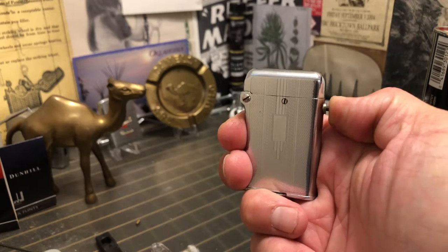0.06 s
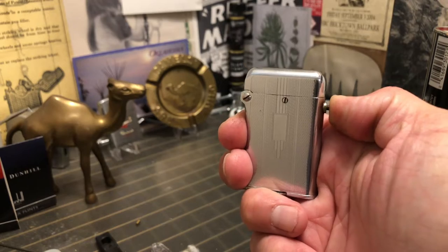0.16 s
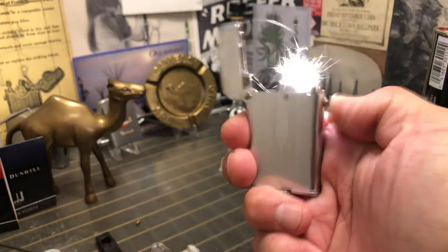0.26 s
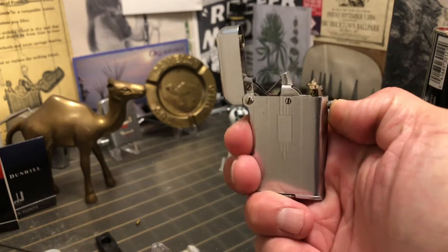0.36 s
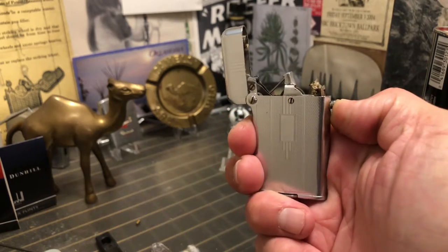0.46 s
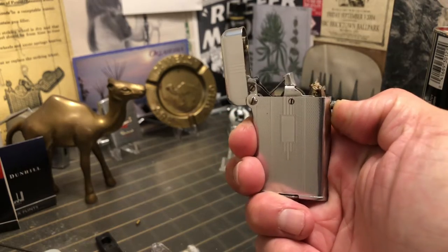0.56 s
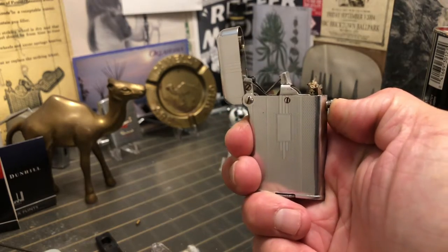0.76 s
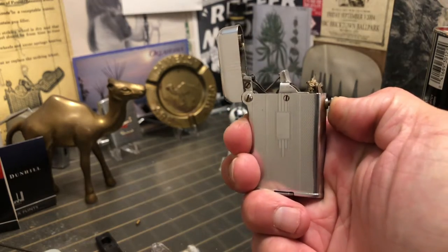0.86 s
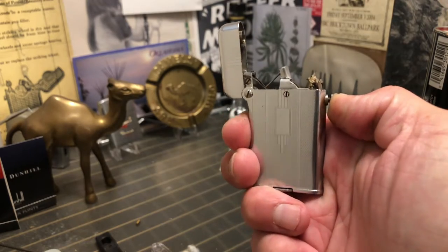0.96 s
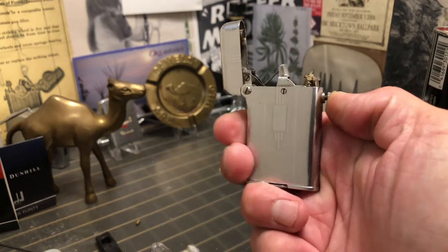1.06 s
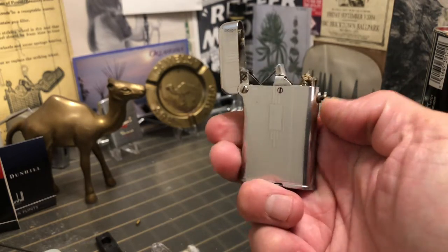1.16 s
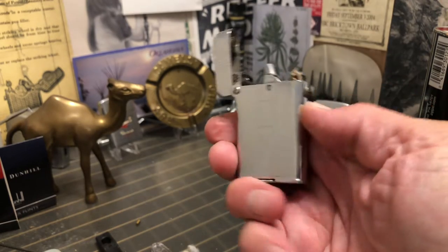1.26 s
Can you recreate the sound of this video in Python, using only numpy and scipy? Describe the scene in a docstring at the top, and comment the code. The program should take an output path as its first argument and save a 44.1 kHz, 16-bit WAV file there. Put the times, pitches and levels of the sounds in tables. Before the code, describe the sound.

One crisp metallic click of a lighter lid springing open in a quiet room.

```python
"""A low appliance hum wavers over rumble, moving air and faint hiss in a small room.
A thumb presses the button of a spring-loaded metal lighter close by: the catch slips and ticks.
The lid flies open and chatters against its stop; its first blow rings the metal and jolts the case.
The desk and the room scatter these sounds into a short tail.
A soft knock follows, and last come three tiny ticks of the hinge."""
import sys
import numpy as np
from scipy import signal
from scipy.fft import rfft, irfft
from scipy.io import wavfile
from scipy.ndimage import uniform_filter1d

SR = 44100
rng = np.random.default_rng(int(sys.argv[2]) if len(sys.argv) > 2 else 0)


def log_audio(samples):
    """Write samples as a 16-bit WAV file to the path given in sys.argv[1]."""
    # one column per channel
    frames = np.atleast_2d(samples).T
    # limit to full scale, then quantise
    limited = np.clip(frames, -1, 1)
    pcm = np.round(limited * 32767).astype(np.int16)
    wavfile.write(sys.argv[1], SR, pcm)


N = 57330

# The weaker hum tones. Each row: frequency in Hz, level in dB before the swell.
HUM_TONES = [(63, -62.5), (138, -69.5), (160, -70), (219, -72), (230, -71.5), (495, -90.5)]
# The swell of those tones and the air. Each row: time in seconds, gain in dB.
SWELL = [(0, -0.5), (0.2, 1), (0.55, 1.5), (0.85, 1), (1.0, 0.5), (1.2, -2.5), (1.3, -1.5)]
# The strongest hum tone. Each row: time in seconds, level in dB about which it wavers.
DRONE_LEVELS = [(0, -63), (0.3, -63), (0.45, -57.5), (0.8, -57), (1.3, -60)]
# Spectra of the background noises. Each row: frequency in Hz, relative level in dB.
RUMBLE_SPECTRUM = [(15, -4), (35, 2), (55, -6), (80, -12.5), (130, -24), (400, -67.5)]
AIR_SPECTRUM = [(60, -4.5), (130, 3), (190, -5.5), (240, -4.5), (280, -11), (350, -16), (450, -26),
                (1000, -47)]
HISS_SPECTRUM = [(300, -1), (600, 3), (1000, -0.5), (2200, -9), (5000, -12), (15000, -23.5)]
# Contacts of the lighter's parts. Each row: start in seconds, relative level in dB.
CATCH_SLIPS = [(0.2341, -25), (0.2350, -21.5), (0.2386, -19)]
LID_BLOWS = [(0.2446, -11.5), (0.2457, -12.5), (0.2468, -16), (0.2479, -16)]
KNOCKS = [(0.618, -75), (0.624, -71), (0.637, -72)]
HINGE_TICKS = [(0.783, -72.5), (0.894, -83), (1.265, -77.5)]
# Spectra of their contact noise. Each row: frequency in Hz, relative level in dB.
CATCH_SPECTRUM = [(300, -25.5), (1000, -26), (1800, -11.5), (2600, -14.5), (4000, 3.5), (5600, -17.5),
                  (7800, -11.5), (9000, -12.5), (15500, -14)]
LID_SPECTRUM = [(150, -16), (370, -24), (520, -18), (800, -17), (1100, -17), (1600, -13.5), (2500, -12.5),
                (3300, -6.5), (4000, -1.5), (5000, 3.5), (6500, -5.5), (8000, -3), (9000, -11.5),
                (15500, -13.5)]
KNOCK_SPECTRUM = [(400, -7), (1000, 2), (2000, 0), (2900, 3.5), (3700, -8.5), (5000, -6.5), (7000, -45),
                  (14000, -38)]
TICK_SPECTRUM = [(1500, -25), (3300, -12), (4300, 0), (5400, 1), (6500, -25), (12000, -27)]
# Modes of the catch, of lid and case, and of the case recoiling in the hand.
# Each row: frequency in Hz, relative level in dB, time to fall 60 dB in seconds.
CATCH_MODES = [(1858, -26, 0.019), (3340, -18, 0.018), (3625, -10, 0.017), (3925, -6, .025),
               (4270, -7.5, 0.027), (4480, -11.5, 0.043), (5100, -16, 0.019), (6412, -16, 0.025),
               (7840, -17, 0.035)]
LID_MODES = [(1793, -37.5, 0.076), (3380, -32, .14), (4560, -20.5, .04), (4490, -22, .035),
             (4666, -16.5, .035), (4885, -28, 0.057), (4970, -13, .025), (5500, -28, .08),
             (5700, -17.5, 0.015), (6240, -32, 0.12), (6985, -32.5, .12), (7320, -32, .12),
             (8000, -21.5, .07)]
RECOIL_MODES = [(48.2, 9.5, .1), (156.6, -8.5, 0.12), (255, -9, 0.069), (494, -0.5, 0.057),
                (590, -5.5, 0.023), (780, -9, .03)]
# Spectrum of the reverberation. Each row: frequency in Hz, relative level in dB.
ROOM_SPECTRUM = [(200, -9), (600, -8.5), (1500, 0), (2400, 0), (3600, -3), (5500, 2), (6800, 2.5),
                 (8200, -0.5), (8900, -1), (15000, -1.5)]
# Its decay. Each row: band centre in Hz, reverberation time in seconds.
ROOM_DECAY = [(300, 0.26), (1500, .33), (5000, 0.29), (8000, 0.3), (10000, .25), (15000, 0.15)]


def undb(db):
    """Amplitude grows tenfold for every 20 dB."""
    return 10 ** (np.asarray(db) / 20)


def on_log(points, hz):
    """Interpolation of (Hz, value) points on a log-frequency axis."""
    freqs, values = np.array(points, float).T
    return np.interp(np.log(np.maximum(hz, 1)), np.log(freqs), values)


def curve(points):
    """Linear interpolation of (seconds, value) points at every sample."""
    times, values = np.array(points, float).T
    return np.interp(np.arange(N) / SR, times, values)


def noise(spectrum):
    """Spectral weighting turns white noise into coloured noise of rms 1."""
    gains = undb(on_log(spectrum, np.fft.rfftfreq(N, 1 / SR)))
    coloured = irfft(rfft(rng.standard_normal(N)) * gains, N)
    return coloured / coloured.std()


def drift(rate_hz):
    """Averaging random steps twice gives a slow fluctuation."""
    hold = int(SR / rate_hz)
    steps = np.repeat(rng.standard_normal(64), hold)[:N]
    return uniform_filter1d(uniform_filter1d(steps, hold), hold)


def hum_tone(hz, db, waver_db=2.5, waver_rad=0.99):
    """Slow random modulation of phase and amplitude makes a sinusoid waver."""
    phase = 2 * np.pi * (hz * np.arange(N) / SR + rng.random()) + waver_rad * drift(9.8)
    return np.sqrt(2) * undb(db + waver_db * drift(13)) * np.sin(phase)


def background():
    """Superposition: an appliance's tones add to moving air, deep rumble and hiss."""
    hum = sum(hum_tone(hz, db) for hz, db in HUM_TONES)
    air = undb(-63) * noise(AIR_SPECTRUM)
    rumble = undb(-52) * noise(RUMBLE_SPECTRUM)
    hiss = undb(-81) * noise(HISS_SPECTRUM)
    drone = hum_tone(hz=97.4, db=curve(DRONE_LEVELS))
    return undb(curve(SWELL)) * (hum + air) + drone + rumble + hiss


def decay(start, t60):
    """Damping: after a sudden onset the amplitude falls 60 dB every t60 seconds."""
    age = np.arange(N) / SR - start
    return (age >= 0) * np.exp(-np.log(1000) * np.maximum(age, 0) / t60)


def ring(start, modes):
    """Free vibration is a sum of damped modes, here each at a random phase."""
    age = np.arange(N) / SR - start
    return sum(undb(db) * decay(start, t60) * np.sin(2 * np.pi * (hz * age + rng.random()))
               for hz, db, t60 in modes)


def tint(x, spectrum):
    """A minimum-phase filter of unit energy colours a sound without smearing ahead of its onset."""
    gains = undb(on_log(spectrum, np.fft.rfftfreq(2048, 1 / SR)))
    cepstrum = irfft(np.log(gains))
    cepstrum[1:1024] *= 2  # folding onto positive time makes the filter causal
    cepstrum[1025:] = 0
    response = irfft(np.exp(rfft(cepstrum)))
    return signal.fftconvolve(x, response / np.linalg.norm(response))[:N]


def contact_noise(contacts, spectrum, t60):
    """A brief contact excites a broad band: each gives a decaying burst of coloured noise."""
    bursts = sum(undb(db) * decay(start, t60) * rng.choice([-1., 1.], N) for start, db in contacts)
    return tint(bursts, spectrum)


def catch():
    """Impulsive excitation: each slip of the catch scrapes and sets its modes ringing."""
    ringing = sum(undb(db) * ring(start, CATCH_MODES) for start, db in CATCH_SLIPS)
    scrape = undb(-6) * contact_noise(CATCH_SLIPS, CATCH_SPECTRUM, t60=0.014)
    return ringing + scrape


def lid():
    """Impact and rebound: each blow on the stop cracks; the first rings the metal and jolts the case."""
    start, blow_db = LID_BLOWS[0]
    metal = undb(blow_db + 2.5) * ring(start, LID_MODES)
    chatter = undb(-2) * contact_noise(LID_BLOWS, LID_SPECTRUM, t60=0.011)
    recoil = undb(-45) * ring(start, RECOIL_MODES)
    return metal + chatter + recoil


def reflections(x, desk_db=-12, tail_db=-18):
    """Reverberation: quick scatter from the desk, then a diffuse tail whose top treble dies first."""
    hz = np.fft.rfftfreq(N, 1 / SR)
    diffuse = rfft(noise(ROOM_SPECTRUM))
    tail = 0
    for centre, t60 in ROOM_DECAY:
        band = on_log([(f, f == centre) for f, _ in ROOM_DECAY], hz)  # neighbouring bands cross-fade
        tail = tail + irfft(diffuse * band, N) * decay(start=0.007, t60=t60)
    desk = rng.standard_normal(N) * decay(start=0.005, t60=0.13)
    response = undb(tail_db) * tail / np.linalg.norm(tail) + undb(desk_db) * desk / np.linalg.norm(desk)
    return signal.fftconvolve(x, response)[:N]


def knock():
    """Contacts closer together than their decay time overlap into one soft knock."""
    return contact_noise(KNOCKS, KNOCK_SPECTRUM, t60=0.17)


def hinge_ticks():
    """Light, quickly damped contacts in the hinge sound as separate bright ticks."""
    return contact_noise(HINGE_TICKS, TICK_SPECTRUM, t60=0.025)


def scene():
    """Sound pressures add: background, lighter, reflections, knock and ticks in one channel."""
    lighter = catch() + lid()
    return (background() + lighter + reflections(lighter) + knock() + hinge_ticks())[None]


def record(dry, cutoff_hz=15650):
    """An elliptic low-pass filter steeply removes the highest treble."""
    return signal.sosfilt(signal.ellip(8, .2, 70, cutoff_hz, fs=SR, output="sos"), dry)


dry = scene()
out = record(dry)
log_audio(out)
```